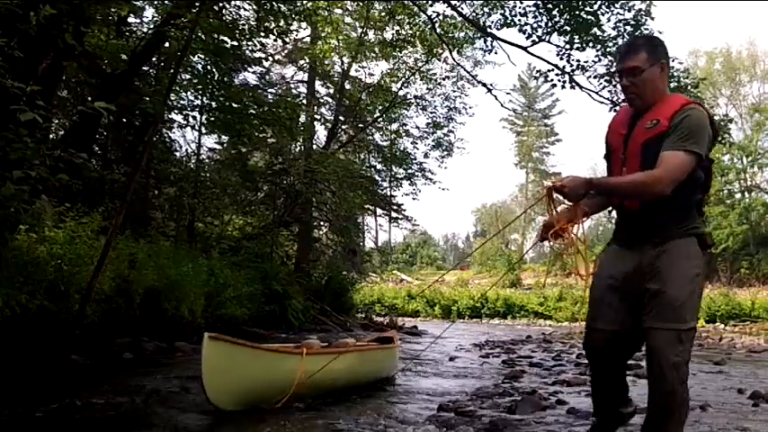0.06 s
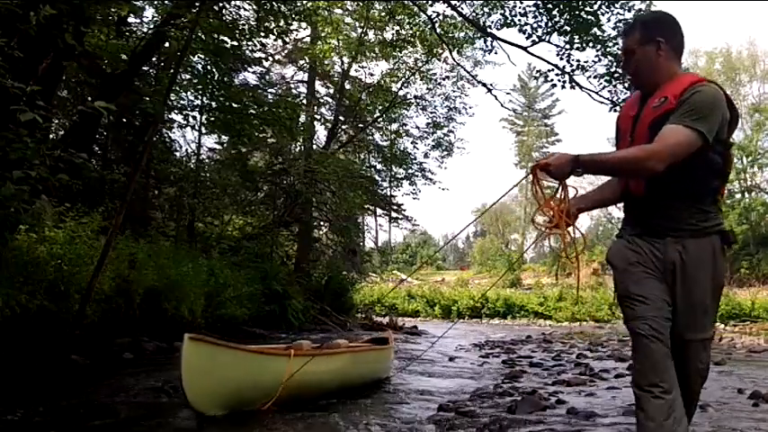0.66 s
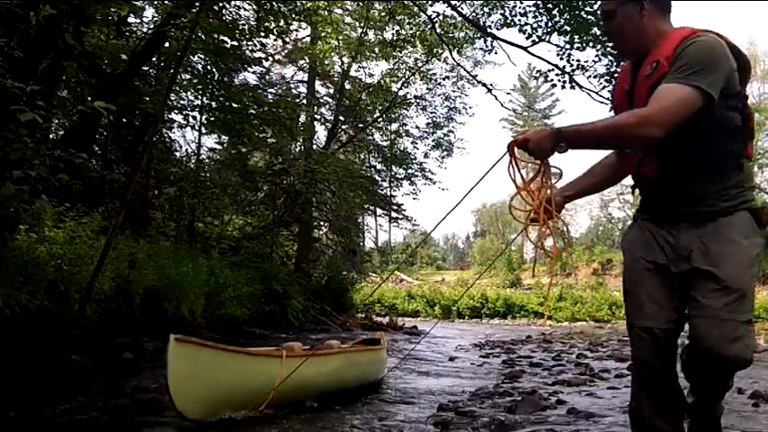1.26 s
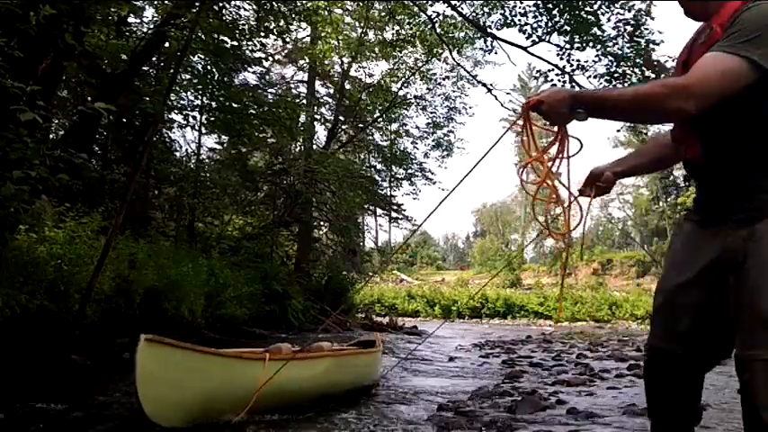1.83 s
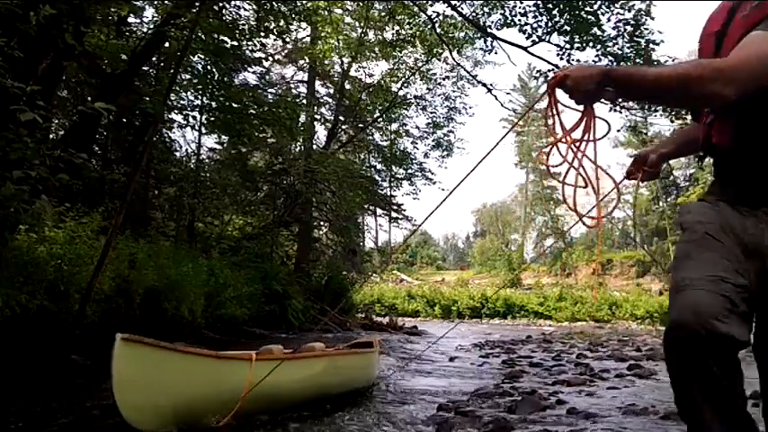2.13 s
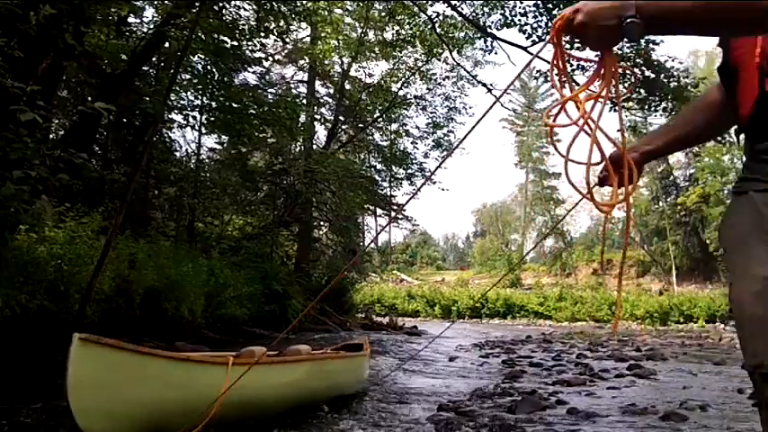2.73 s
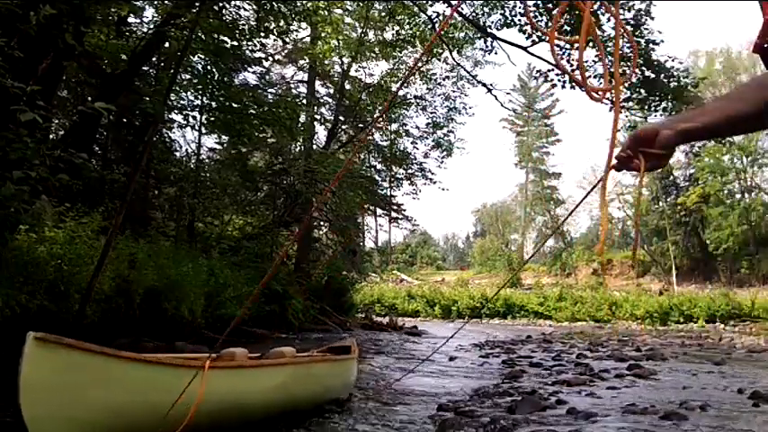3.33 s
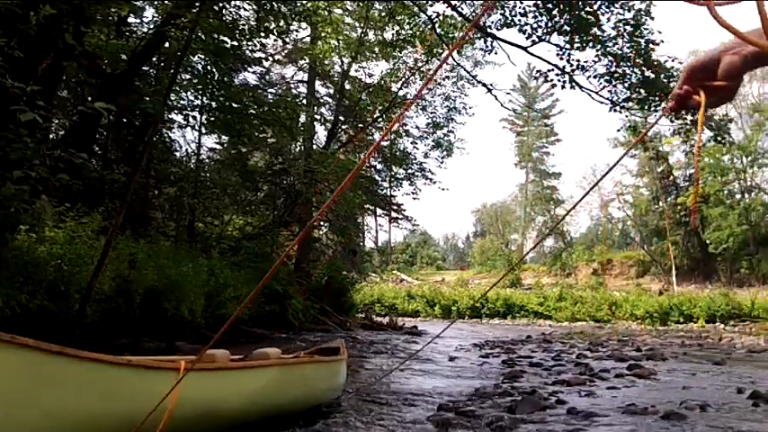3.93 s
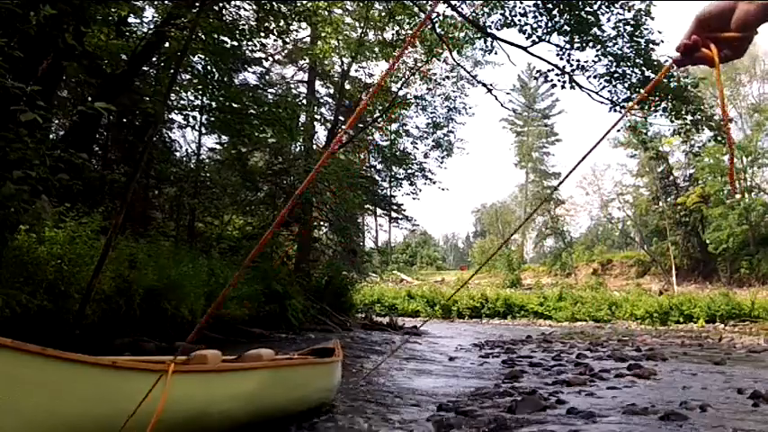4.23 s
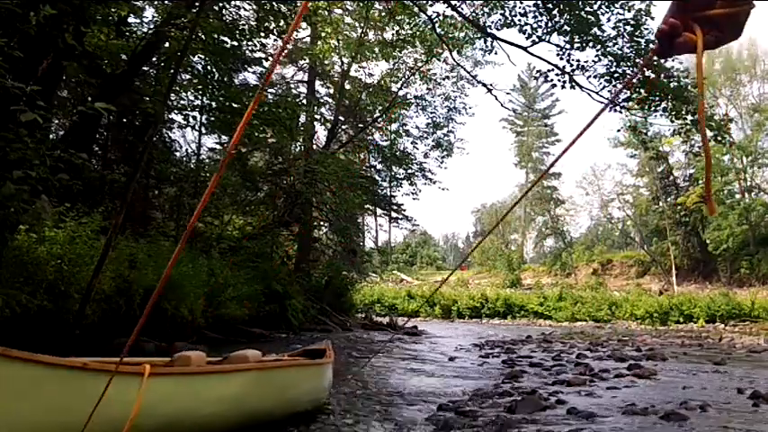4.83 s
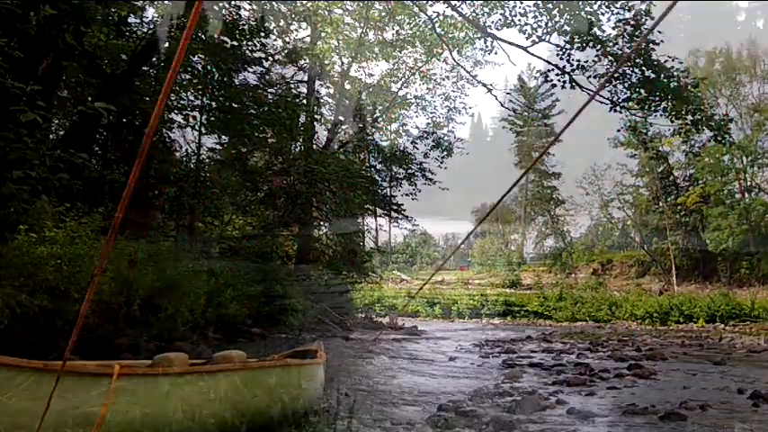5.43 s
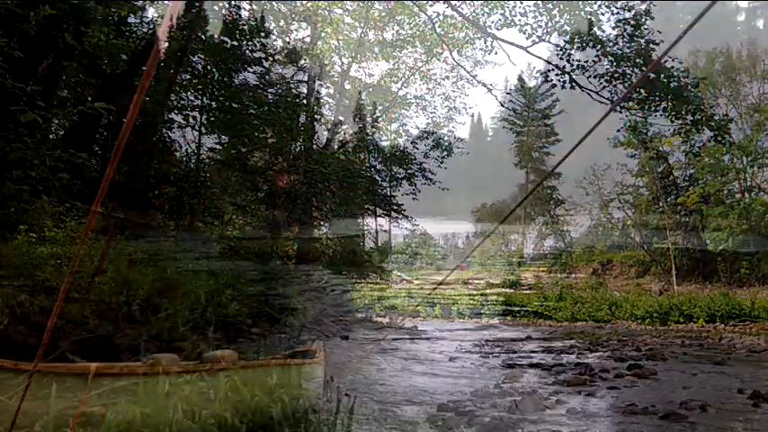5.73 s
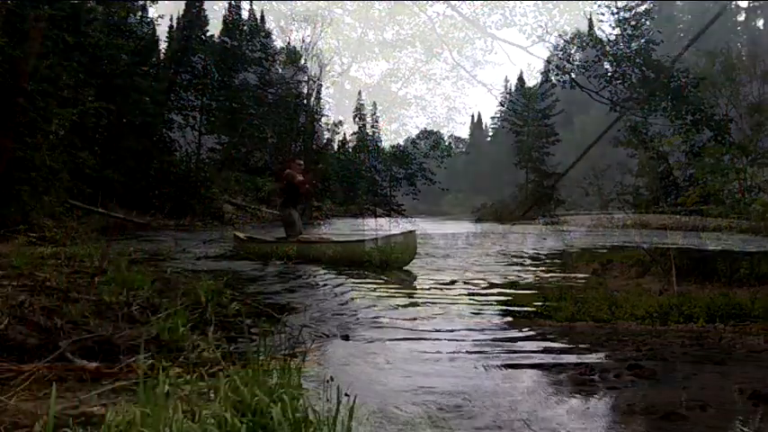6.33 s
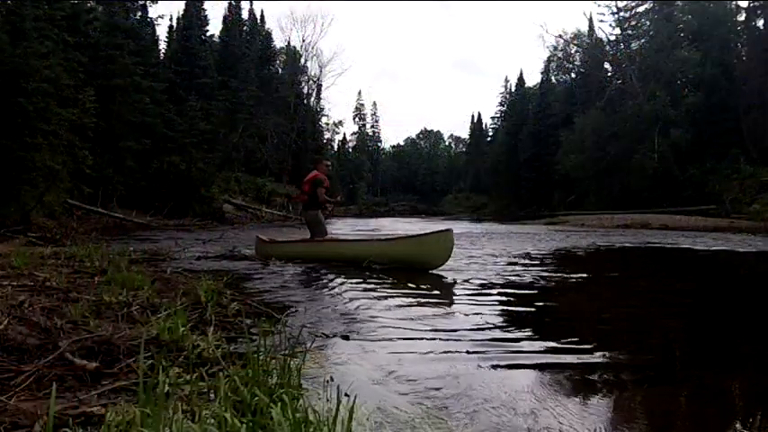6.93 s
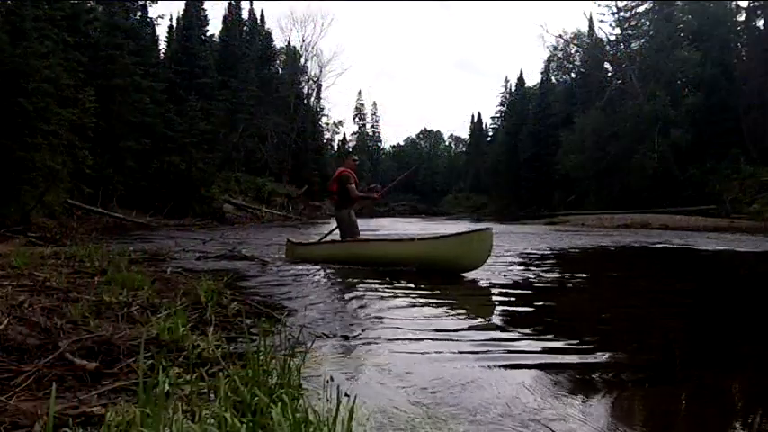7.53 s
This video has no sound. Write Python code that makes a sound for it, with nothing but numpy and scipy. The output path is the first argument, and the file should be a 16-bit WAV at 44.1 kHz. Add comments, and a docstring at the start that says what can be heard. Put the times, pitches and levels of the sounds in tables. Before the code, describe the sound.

A shallow river rushes over rocks close to the microphone, a steady wash full of gurgles, popping bubbles and small splashes. Pebbles click now and then, and later come a few dull underwater knocks and a faint rumble of wind on the microphone. Near the end the rush fades quickly to much quieter, calm water, with a soft wading swish, lapping wavelets and little plops.

```python
"""River rapids, then a calm reach

Close to the microphone a shallow river rushes over rocks: a swarm of short-lived bubbles over a wash of
broken water, with loud pops, low thumps, stones that clack and knock, and one gust on the microphone.
A quick fade leads to a calm reach: wavelets lap and water swishes as someone wades beside a canoe."""
import sys
import numpy as np
from scipy import signal
from scipy.fft import rfft, irfft
from scipy.io import wavfile
from scipy.ndimage import uniform_filter1d

SR = 44100
rng = np.random.default_rng(int(sys.argv[2]) if len(sys.argv) > 2 else 0)


def store_wav(level_fs):
    """Save 16-bit WAV to argv[1]."""
    pcm = np.round(np.clip(np.atleast_2d(level_fs), -1, 1) * 32767)
    wavfile.write(sys.argv[1], SR, pcm.T.astype(np.int16))


N = 338247
TIME = np.arange(N) / SR
# colour of broken water over the rocks (frequency [Hz], level [dB])
RUSH_SPECTRUM = [(60, -28.5), (120, -22.3), (200, -14.5), (330, -6), (480, -1), (750, 1.5), (1250, -1),
                 (2000, -3.5), (3000, -5), (4200, -10), (6000, -20), (10000, -39), (12500, -40.5),
                 (15000, -59)]


def rapids(rush_db=-17.48):
    """Far water blurs into a wash; water near the microphone crackles and gurgles over it."""
    wash = churn(patchy_db=2.5) * gain_of(0.84 * wander(5.6, 25))
    crackle = swarm(per_s=2400, spread_db=1.2, cycles=8.7, low_hz=931, high_hz=8850, clump=0.35)
    gurgle = swarm(per_s=1000, spread_db=2.5, cycles=24.2, low_hz=220.3, high_hz=2960, clump=0.2)
    water = wash + gain_of(-5) * crackle + gain_of(-11.5) * gurgle
    rush = gain_of(rush_db) * coloured(water, RUSH_SPECTRUM)
    blips = stray_bubbles(per_s=4, low_hz=331.7, high_hz=1360, peak_db=-20, spread_db=0.5, cycles=28)
    ticks = stray_bubbles(per_s=7, low_hz=2000, high_hz=6360, peak_db=-6, spread_db=8, cycles=25)
    return rush + blips + ticks + pops() + splats() + pebbles() + knocks() + low_thumps() + spray()


def bubble(hz, cycles, rise=0.11, swell_cycles=0.54):
    """A pocket of air rings, dying by 60 dB over `cycles`, its pitch rising as it nears the surface."""
    turns = np.arange(int(cycles / hz * SR) + 4) * hz / SR
    age = turns / cycles
    envelope = (1 - np.exp(-(turns / swell_cycles) ** 2)) * np.exp(-np.log(1000) * age)
    return envelope * np.sin(2 * np.pi * turns * (1 + rise * age))


def swarm(per_s, spread_db, cycles, low_hz, high_hz, clump, count=48):
    """Bubbles of all sizes, born in clumps, most faint and a few loud; equal power per Hz."""
    pitches = np.geomspace(low_hz, high_hz, count)
    shares = np.sqrt(pitches) / np.sqrt(pitches).sum()  # small bubbles are the more common
    surge = np.exp(clump * wander(5, 40))
    slots = np.arange(0, N, 8)
    out = np.zeros(N)
    for hz, share in zip(pitches, shares):
        chance, size, sign = rng.random((3, len(slots)))
        born = chance < per_s * share * surge[slots] * slots[1] / SR
        size_db = spread_db * np.minimum(-np.log(1 - size[born]), 4.5)
        births = np.zeros(N)
        births[slots[born]] = np.sign(sign[born] - 0.5) * gain_of(size_db)
        out += np.sqrt(hz) * unit_rms(signal.oaconvolve(births, bubble(hz, cycles))[:N])
    return unit_rms(out)


def churn(patchy_db):
    """Churning water: white noise that swells and thins in patches some 600 Hz wide and 60 ms long."""
    noise = signal.stft(rng.standard_normal(N), nperseg=512, noverlap=256)[2]
    patches = uniform_filter1d(rng.standard_normal(noise.shape), size=7, axis=0)
    patches = unit_rms(uniform_filter1d(patches, size=10, axis=1))
    return unit_rms(signal.istft(noise * gain_of(patchy_db * patches), nperseg=512, noverlap=256)[1][:N])


def stray_bubbles(per_s, low_hz, high_hz, peak_db, spread_db, cycles):
    """Now and then a bubble stands out, loudest at the pitches where the rush is loudest."""
    when, pitch, size = rng.random((400, 3))[:int(per_s * N / SR)].T
    hz = low_hz * (high_hz / low_hz) ** pitch
    db = peak_db - spread_db * size + np.interp(hz, *np.transpose(RUSH_SPECTRUM))
    return rings(zip(when * N / SR, hz, db, np.full(len(hz), cycles)))


def pops(snap_db=-19, snap_s=0.0017):
    """Each bubble close to the microphone breaks the surface with a brief wet snap, then rings."""
    # the loudest bubbles (time [s], pitch [Hz], level [dB], ring length [cycles])
    bursts = [(.165, 700, -9.5, 25), (.812, 524, -13, 26), (.824, 513, -18.5, 44), (1.059, 1070, -12, 36),
              (1.350, 2400, -8, 18), (1.59, 400, -16, 32), (2.498, 422, -17.5, 50), (2.881, 368, -21, 27),
              (3.071, 590, -14.5, 38), (3.168, 1440, -9.5, 60), (3.415, 2400, -6.5, 18),
              (3.667, 1016, -10.5, 41), (3.700, 544, -19, 41), (3.862, 640, -8, 18), (3.874, 610, -8.5, 20),
              (4.047, 1760, -6.5, 24), (4.470, 2710, -9, 34), (4.475, 496, -17.5, 54),
              (4.846, 1570, -7, 28), (5.046, 313, -21, 30), (5.321, 2970, -13, 66), (5.998, 1120, -10, 28),
              (6.0062, 785, -2, 24), (6.007, 380, -17, 16), (6.212, 297, -22, 28), (6.468, 3200, -13, 60),
              (6.610, 1335, -15, 58)]
    return rings(bursts) + gain_of(snap_db) * snaps(bursts, snap_s, RUSH_SPECTRUM)


def splats(scatter_s=0.008, scatter_octaves=0.48, spatter_db=-9, spread_db=7, cycles=13, count=9):
    """Water slaps a stone: one sharp drop amid a spatter of weaker ones, scattered in time and pitch."""
    # main drop of each splash (time [s], pitch [Hz], level [dB])
    main_drops = [(.0824, 4340, -15), (.7937, 4900, -12), (0.7935, 2400, -8), (.813, 4540, -14),
                  (0.9332, 2600, -11), (1.111, 2090, -10), (1.120, 2750, -6.5), (1.3675, 2430, -5),
                  (1.362, 4380, -12), (2.924, 2000, -10), (3.3416, 4370, -11), (3.5457, 1550, -8),
                  (3.829, 2180, -10), (3.8586, 3030, -4), (3.9545, 4940, -15), (4.1255, 4560, -13),
                  (4.2747, 2800, -11), (4.323, 4900, -12.5), (4.4713, 2900, -8), (5.006, 4020, -9),
                  (5.188, 2420, -14), (5.2768, 3300, -9), (5.887, 5500, -19), (5.9087, 4890, -12),
                  (5.939, 2700, -9), (6.029, 2200, -7.5), (6.1146, 4606, -15), (6.189, 1990, -14),
                  (6.225, 1800, -16), (6.4038, 5770, -13), (6.417, 2000, -9), (6.444, 3500, -12),
                  (6.447, 4480, -17), (6.592, 1620, -8), (6.669, 1510, -10), (6.712, 2400, -11)]
    # colour of the slap (frequency [Hz], level [dB])
    slap_spectrum = [(300, -28), (1500, -3), (3000, 4), (5000, 1), (7000, -19), (12000, -44), (15000, -58)]
    drops = []
    for s, hz, db in main_drops:
        drops.append((s, hz, db, cycles))
        for when, pitch, size in rng.uniform(-0.92, 1, (count, 3)):
            drop_db = db + spatter_db - spread_db * abs(size)
            drops.append((s + scatter_s * when, hz * 2 ** (scatter_octaves * pitch), drop_db, cycles))
    slaps = snaps(main_drops, decay_s=0.0049, spectrum=slap_spectrum)
    return rings(drops, swell_share=0.07) + gain_of(-13) * slaps


def pebbles(cycles=12, grit_s=0.0035):
    """Two pebbles meet in the stream bed: a short hard click, then grit scraping between them."""
    # pebble strikes (time [s], pitch [Hz], click level [dB], scrape level [dB])
    clacks = [(2.732, 2300, -2, -25), (2.7693, 4750, -9, -13), (3.8521, 2880, -0.5, -29)]
    # colour of the scrape (frequency [Hz], level [dB])
    grit_spectrum = [(800, -9), (2500, -8), (4300, 0), (5500, -4), (6800, -18), (10000, -36), (15000, -50)]
    clicks = rings([(s, hz, db, cycles) for s, hz, db, _ in clacks], swell_share=0.15)
    return clicks + snaps([(s, hz, grit_db) for s, hz, _, grit_db in clacks], grit_s, grit_spectrum)


def knocks(cycles=13, thud_db=-5, thud_s=0.010):
    """Under water a larger stone settles on another: a dull thud with a short, damped ring."""
    # shifting stones (time [s], pitch [Hz], level [dB])
    stones = [(5.0403, 424, -13), (5.3293, 310, -20), (5.428, 355, -18), (5.586, 325, -16.5)]
    # colour of the thud (frequency [Hz], level [dB])
    thud_spectrum = [(50, -32), (130, -9), (250, -1), (600, 2), (900, -3), (2000, -22), (8000, -55)]
    ringing = rings([(s, hz, db, cycles) for s, hz, db in stones])
    return ringing + gain_of(thud_db) * snaps(stones, thud_s, thud_spectrum)


def low_thumps(cycles=13.4, rumble_db=-17, rumble_s=0.021, settle_db=-9, settle_s=0.1):
    """Soft, low, round thumps, each with a faint rumble that settles."""
    # low thumps (time [s], pitch [Hz], level [dB])
    thumps = [(1.847, 138, -30), (1.948, 228, -31), (5.013, 173, -21.5), (5.022, 92, -38),
              (5.331, 167, -24.5), (5.342, 85, -34), (5.409, 233, -24), (5.594, 175, -19.5),
              (5.631, 222, -30), (6.129, 140, -31), (6.198, 174, -40)]
    # colour of the rumble around each thump (frequency [Hz], level [dB])
    rumble_spectrum = [(30, -16), (80, -18), (170, 21), (400, 5), (700, -16), (1500, -39), (5000, -75)]
    onset = sum(gain_of(db) * np.exp(-((TIME - s - rumble_s / 2) / rumble_s) ** 2) for s, _, db in thumps)
    settling = sum(swell(s + 2 * rumble_s, db + settle_db, rumble_s, settle_s) for s, _, db in thumps)
    rumble = (onset + settling) * coloured(rng.standard_normal(N), rumble_spectrum)
    return rings([(s, hz, db, cycles) for s, hz, db in thumps]) + gain_of(rumble_db) * rumble


def spray(puff_s=0.014, mist_db=-50, flicker_db=2.5):
    """A fine fizz comes and goes; each splash adds a brief puff of droplets."""
    # small splashes (time [s], level [dB])
    splashes = [(3.34, -43), (3.84, -45), (5.325, -40), (5.73, -43)]
    # colour of the spray (frequency [Hz], level [dB])
    spray_spectrum = [(1000, -21), (3000, 10), (6000, -19), (9700, 6), (11300, -1), (12800, -62),
                      (14500, -28)]
    mist = gain_of(mist_db + flicker_db * wander(3, 16))
    puffs = sum(gain_of(db) * np.exp(-((TIME - s) / puff_s) ** 2) for s, db in splashes)
    fizz = rng.standard_normal(N) * gain_of(2 * wander(40, 160))
    return (mist + puffs) * coloured(fizz, spray_spectrum)


def calm_reach(murmur_db=-44):
    """Slow water murmurs under the wading, the wavelets and a few plops."""
    # colour of slow water (frequency [Hz], level [dB])
    murmur_spectrum = [(40, -14), (130, -9), (260, -3.5), (450, -0.5), (650, 0), (850, -6), (1150, -4),
                       (1700, -3.5), (2300, -11), (3500, -22), (5500, -22.5), (7000, -27), (10000, -30),
                       (15000, -28)]
    # drips and soft laps (time [s], pitch [Hz], level [dB], ring length [cycles])
    plops = [(6.9792, 1140, -30, 24), (7.068, 417, -37.5, 48), (7.139, 610, -38, 27), (7.172, 444, -39, 36),
             (7.298, 176, -40, 9), (7.314, 1630, -28.5, 30), (7.370, 378, -31, 18), (7.372, 200, -39, 4),
             (7.443, 630, -39, 44), (7.450, 1890, -35, 30), (7.479, 590, -36.5, 28)]
    murmur = gain_of(murmur_db) * coloured(churn(patchy_db=2), murmur_spectrum)
    return murmur + wading() + laps() + rings(plops)


def wading(froth_db=-8):
    """One stride stirs up a soft bubbly swish that builds, peaks and settles."""
    # colour of the swish (frequency [Hz], level [dB])
    swish_spectrum = [(60, -5), (160, 0), (380, -4), (620, -6), (880, -9), (1250, -1), (1650, 1.5),
                      (2200, -8), (3000, -19), (4500, -27), (10000, -45)]
    froth = swarm(per_s=1400, spread_db=4, cycles=15, low_hz=152, high_hz=3400, clump=0.18, count=24)
    stride = swell(peak_s=7.38, peak_db=-44, rise_s=0.2, fall_s=0.16) * gain_of(1.5 * wander(9.7, 13))
    return stride * coloured(churn(patchy_db=3) + gain_of(froth_db) * froth, swish_spectrum)


def laps(rise_s=0.0068, fall_s=0.019, foam_db=-2):
    """Each wavelet tips over quickly and drains away in a trickle of small bubbles and a little foam."""
    # wavelets around the stride (time [s], level [dB])
    wavelets = [(7.000, -48), (7.140, -50), (7.195, -40), (7.299, -38.5), (7.358, -38), (7.415, -39),
                (7.452, -41), (7.563, -39)]
    # colour of a breaking wavelet (frequency [Hz], level [dB])
    trickle_spectrum = [(100, -14), (400, -1), (600, 0), (880, -11), (1300, -1), (1650, 4), (2200, -11),
                        (3000, -27), (10000, -45)]
    trickle = swarm(per_s=1500, spread_db=1.1, cycles=17, low_hz=347, high_hz=2600, clump=0.1, count=16)
    breaking = sum(swell(s, db, rise_s, fall_s) for s, db in wavelets)
    return breaking * coloured(trickle + gain_of(foam_db) * rng.standard_normal(N), trickle_spectrum)


def wind(breeze_db=-69):
    """A light breeze and one gust buffet the microphone with a lumpy rumble."""
    # colour of the buffeting (frequency [Hz], level [dB])
    buffet_spectrum = [(10, 4), (28, 0), (55, -2), (100, -10), (200, -24), (600, -60), (3000, -90)]
    strength = gain_of(breeze_db) + swell(peak_s=4.87, peak_db=-48, rise_s=0.1, fall_s=1.2)
    return strength * coloured(rng.standard_normal(N), buffet_spectrum) * gain_of(1.4 * wander(2.8, 12))


def rings(rows, swell_share=0.032):
    """A damped, slightly rising ring for each (time [s], pitch [Hz], level [dB], length [cycles])."""
    out = np.zeros(N)
    for s, hz, db, cycles in rows:
        ring = bubble(hz, cycles, swell_cycles=swell_share * cycles)  # longer rings start more softly
        part = out[round(s * SR):][:len(ring)]
        part += gain_of(db) * ring[:len(part)] / abs(ring).max()
    return out


def snaps(rows, decay_s, spectrum):
    """A sudden, fast-dying burst of noise for each (time [s], unused pitch [Hz], level [dB], ...)."""
    envelope = np.zeros(N)
    for s, _, db, *_ in rows:
        after = TIME[round(s * SR):]
        envelope[-len(after):] += gain_of(db) * np.exp(-np.minimum((after - after[0]) / decay_s, 20))
    return np.sqrt(np.mean(envelope ** 2)) * coloured(envelope * rng.standard_normal(N), spectrum)


def swell(peak_s, peak_db, rise_s, fall_s):
    """A gain that grows to its peak and dies away, each with its own time constant."""
    return gain_of(peak_db) * np.exp(np.minimum((TIME - peak_s) / rise_s, (peak_s - TIME) / fall_s))


def wander(slow_hz, fast_hz):
    """A random drift between two rates, at rms 1."""
    t, rates = TIME[::128], np.geomspace(slow_hz, fast_hz, 40)
    waves = np.sin(2 * np.pi * (rates[:, None] * t + rng.random((40, 1))))
    return np.interp(TIME, t, unit_rms(waves.sum(0)))


def coloured(x, spectrum):
    """Shapes a sound by a spectrum (frequency [Hz], level [dB]), at rms 1."""
    hz, db = np.transpose(spectrum)
    bins = np.fft.rfftfreq(N, 1 / SR)
    return unit_rms(irfft(rfft(x) * gain_of(np.interp(np.log(bins + 1), np.log(hz), db)), N))


def gain_of(db):
    """Decibels to amplitude."""
    return 10 ** (np.asarray(db) / 20)


def unit_rms(x):
    """Scales to rms 1."""
    return x / np.sqrt(np.mean(x ** 2) + 1e-20)


def gain_control(x, threshold_db=-18.5, share=0.47, recovery_db_per_s=110, attack_s=0.0046):
    """A loud moment pulls the level down just after it, and the level soon creeps back."""
    pole = np.exp(-1 / (attack_s * SR))
    power_db = 10 * np.log10(signal.lfilter([1 - pole], [1, -pole], x ** 2) + 1e-12)
    recovery_db = TIME * recovery_db_per_s
    held_db = np.maximum.accumulate(power_db + recovery_db, axis=-1) - recovery_db
    over_db = np.maximum(held_db - threshold_db, 0)
    return x / gain_of(share * signal.lfilter([1 - pole], [1, -pole], over_db))


def scene(fade_start_s=6.798, fade_end_s=6.833):
    """The rapids fade quickly into the calm reach, with wind on the microphone in both places."""
    at_rapids = np.clip((fade_end_s - TIME) / (fade_end_s - fade_start_s), 0, 1) ** 2
    return (at_rapids * rapids() + (1 - at_rapids) * calm_reach() + wind())[None]


def record(dry, null_hz=7850, null_width_hz=560, null_db=-34, band_limit_hz=15400):
    """One microphone with a deep null in its treble, then gain control and a band limit."""
    hz = np.fft.rfftfreq(N, 1 / SR)
    response = gain_of(null_db * np.exp(-((hz - null_hz) / null_width_hz) ** 2))
    heard = gain_control(irfft(rfft(dry) * response, N))
    lowpass = signal.firwin(511, band_limit_hz, window=("kaiser", 9), fs=SR)
    return signal.oaconvolve(heard, lowpass[None], "same")


dry = scene()
out = record(dry)
store_wav(out)
```